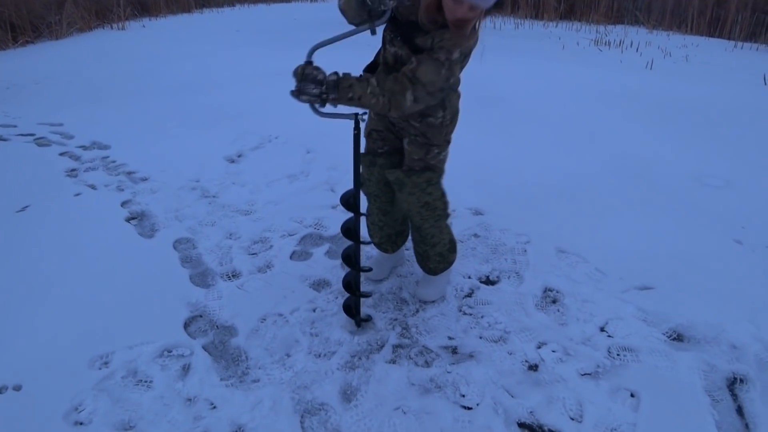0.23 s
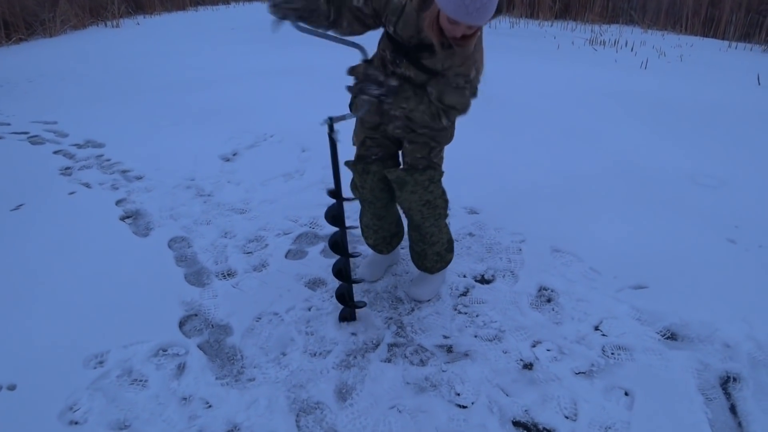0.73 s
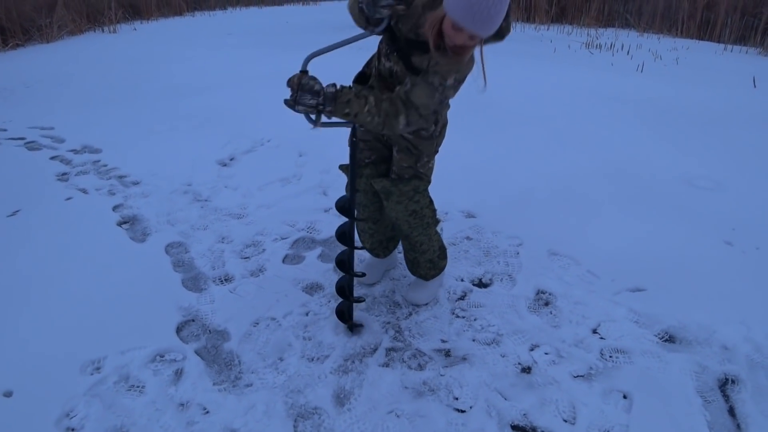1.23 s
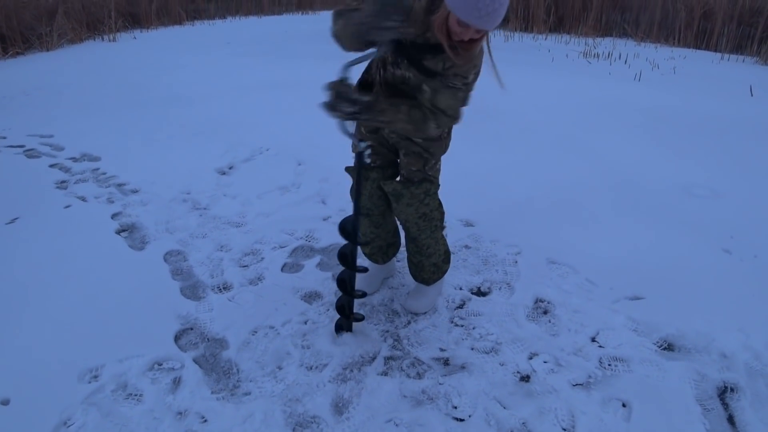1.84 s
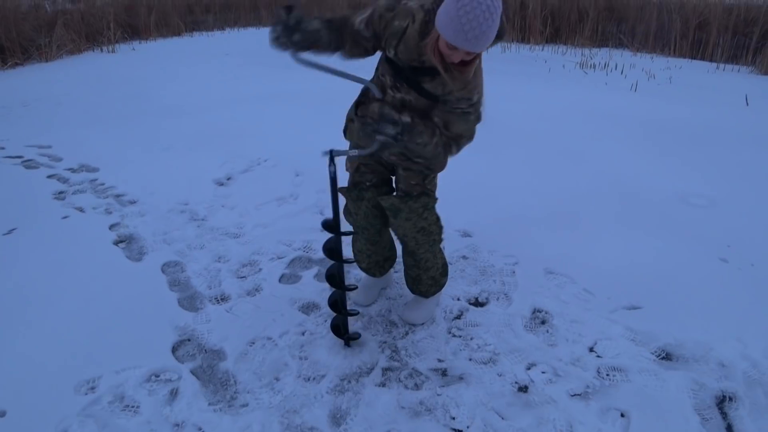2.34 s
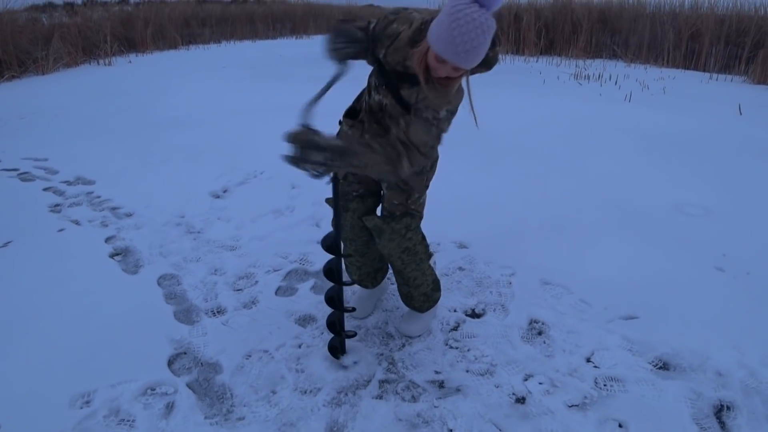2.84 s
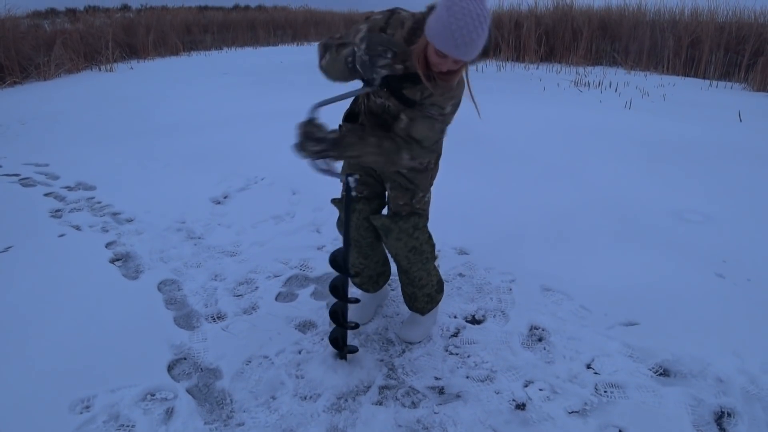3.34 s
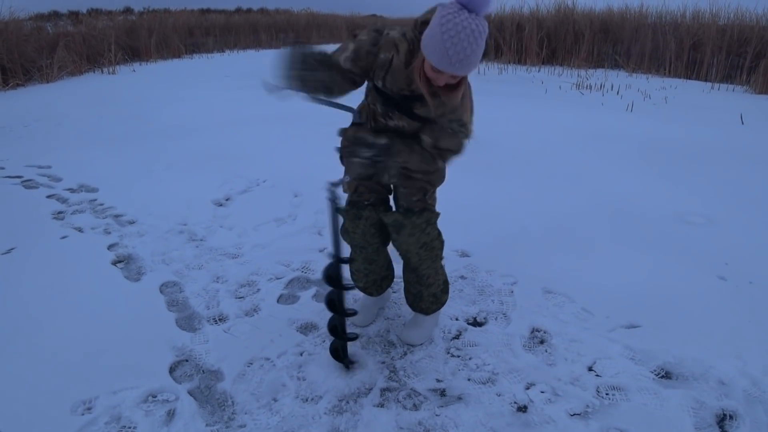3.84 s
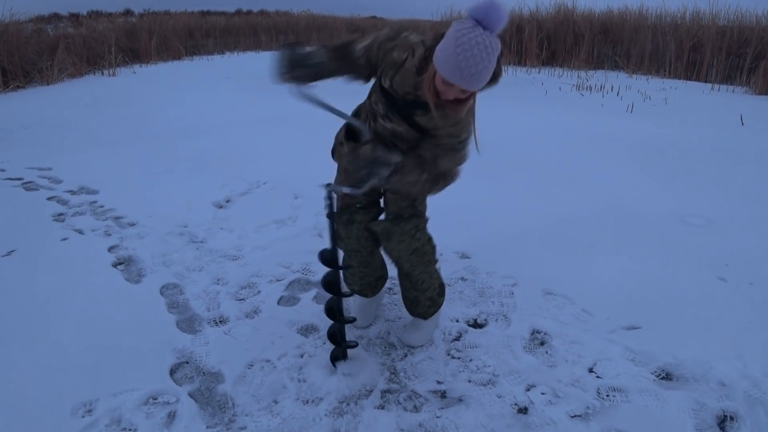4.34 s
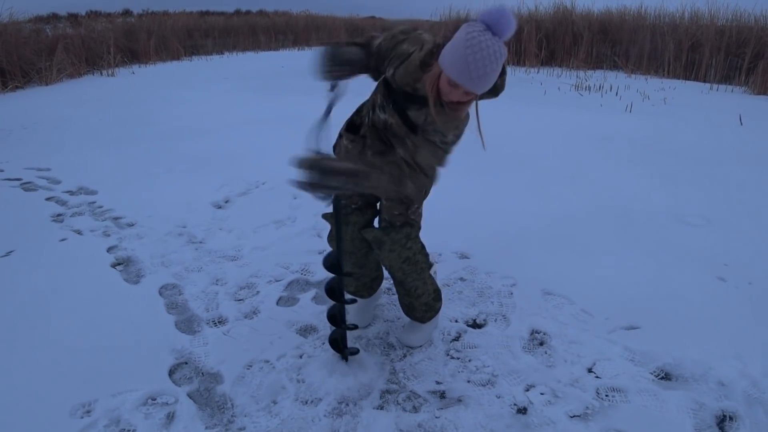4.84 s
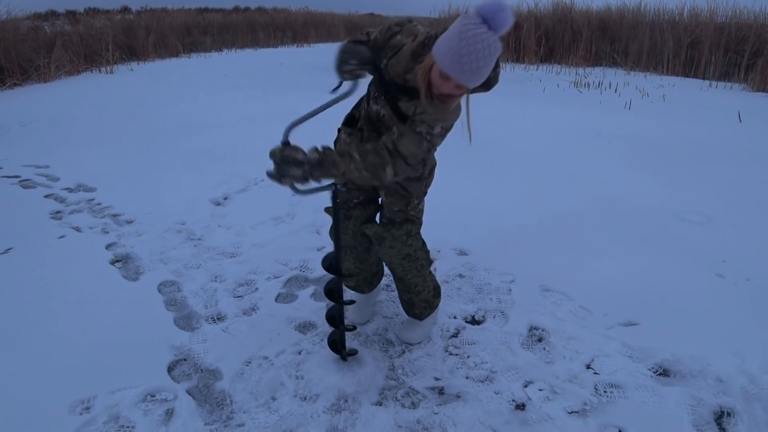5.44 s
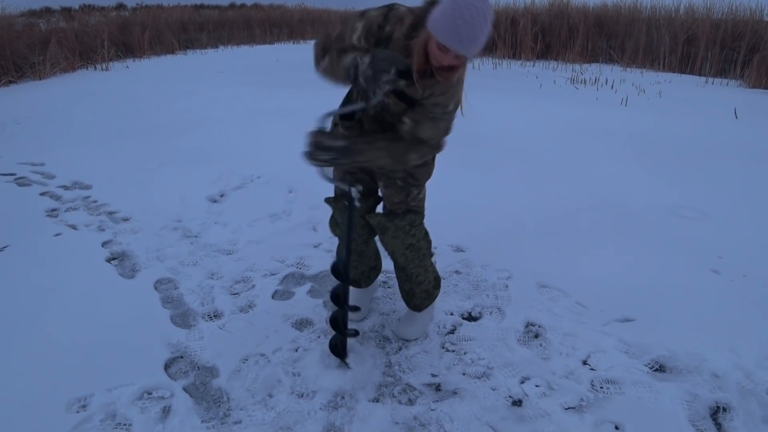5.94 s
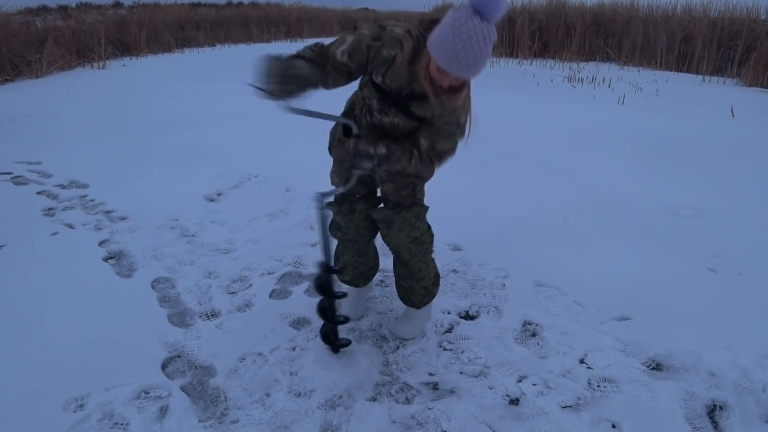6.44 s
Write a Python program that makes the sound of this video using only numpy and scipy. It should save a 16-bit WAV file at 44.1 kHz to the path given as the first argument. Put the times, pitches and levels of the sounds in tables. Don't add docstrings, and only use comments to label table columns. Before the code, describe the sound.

From the start a hand auger is already cutting thick pond ice, close and loud in an open, dry snowy space. Its blades make a dense, bright crunch of shaved chips, rising and slackening with each crank turn of about 0.7 seconds. Underneath, the steel shaft and spiral ring with a hollow, wavering midrange voice, and the ice sheet groans low. Sharp fractures snap near 0.2, 0.4 and 0.85 seconds. Around 1.2 the blades grab and stall; for a moment there is almost only a deep thud and a higher knock, then a hard break at 1.3 and full cutting by 1.4. From 2 to 5 seconds the grinding runs on with scattered cracks, the shaft singing more clearly. From 5.2 to the end it grows choppier, with frequent snaps and a deeper slackening near 6.1, still cutting at about 6.7. Faint low wind buffets the microphone throughout.

```python
import sys
import numpy as np
from scipy import signal
from scipy.fft import rfft, irfft, next_fast_len
from scipy.io import wavfile
from scipy.ndimage import uniform_filter1d, map_coordinates

SR = 44100
rng = np.random.default_rng(int(sys.argv[2]) if len(sys.argv) > 2 else 0)


def gain_from_db(level_db):
    decades = np.asarray(level_db, float) / 20
    return 10 ** decades


def file_out(sig):
    cols = np.atleast_2d(sig).T
    lim = np.clip(cols, -1, 1)
    pcm = np.round(lim * 32767).astype(np.int16)
    wavfile.write(sys.argv[1], SR, pcm)


N = 295029


def unit(x):
    return x / np.sqrt(np.mean(x ** 2) + 1e-20)


def along(points, hz):
    f, v = np.transpose(points)
    return np.interp(np.log(hz + 1), np.log(f + 1), v)


def bumps(rows):
    t = np.arange(N) / SR
    return sum(db * np.cos(np.pi * np.clip((t - s) / length, -.5, .5)) ** 2 for s, db, length in rows)


def wobble(rate):
    return map_coordinates(rng.standard_normal(int(N * rate / SR) + 4), [np.arange(N) * rate / SR])


def field(shape, bins, frames):
    rough = rng.standard_normal(shape)
    return unit(uniform_filter1d(uniform_filter1d(rough, bins, 0), frames, 1))


def filtered(x, response):
    m = next_fast_len(N + SR // 2)
    h = response(np.fft.rfftfreq(m, 1 / SR))
    h = unit(np.abs(h)) * np.exp(1j * np.angle(h))
    return irfft(rfft(x, m) * h, m)[..., :N]


def mode(f, hz, width_hz):
    return 1j * f * width_hz / (hz * hz - f * f + 1j * f * width_hz)


def ringing(x, hz, width_hz):
    return signal.lfilter(*signal.iirpeak(hz, hz / width_hz, SR), x)


# (time [s], peak level [dB])
WIND_GUSTS = [(0.0, -49), (0.33, -44), (.6, -50), (.85, -55), (1.27, -50), (1.75, -61), (1.97, -48),
              (2.4, -51), (2.62, -52), (2.85, -49), (3.3, -51), (3.57, -53), (3.8, -48), (3.95, -49),
              (4.79, -50), (5.23, -50), (6.05, -59)]


def gusts():
    calm_db, fall_db_per_s = -65, 70
    t = np.arange(N) / SR
    power = gain_from_db(2 * calm_db)
    for s, db in WIND_GUSTS:
        power = power + gain_from_db(2 * (db - fall_db_per_s * np.abs(t - s)))
    return np.sqrt(power)


# (frequency [Hz], level [dB per Hz])
WIND_COLOUR = [(18, -3), (40, 6.5), (70, -13), (110, -9), (200, -13), (400, -36), (11000, -50)]


def wind():
    noise = rng.standard_normal((2, N))
    shared, own = filtered(noise, lambda f: gain_from_db(along(WIND_COLOUR, f)))
    level = gusts() * gain_from_db(0.5 + 1.9 * wobble(11.0) + 1.1 * wobble(24.96))
    return level * np.array([shared + 0.3 * own, shared - 0.24 * own])


# (time [s], level [dB], pitch [Hz], t60 [s])
ROCKING = [
    (1.262, -34, 70, .05),
    (1.292, -28, 290, 0.059),
]


def thuds():
    out, t = np.zeros(N), np.arange(SR // 10) / SR
    for s, db, hz, t60 in ROCKING:
        out[round(s * SR):][:len(t)] += gain_from_db(db - 60 * t / t60) * np.sin(2 * np.pi * hz * t)
    return out


# (time [s], depth [dB], length [s])
SLACK_POINTS = [(0.1, -3.5, 0.55), (0.36, -6.5, 0.33), (0.85, -3, 0.18), (1.1, -4, 0.2), (1.55, -2.5, 0.11),
                (2.07, -4, 0.29), (2.2, -1, 0.22), (2.58, -1, 0.2), (2.9, -1.5, 0.12), (2.77, -3.5, 0.18),
                (3.25, -2, 0.33), (3.43, -4.5, .08), (3.49, -2, .12), (3.62, -2, 0.52), (4.16, -5.5, 0.36),
                (4.73, -4, 0.32), (5.16, -3, 0.098), (5.33, -7.5, .3), (5.45, -6.5, 0.12), (5.55, -4, 0.11),
                (5.63, -4, 0.075), (5.82, -1, 0.16), (6.06, -9.5, 0.22), (6.16, -7, 0.28), (6.63, -3, 0.16)]
# (time [s], bite [dB])
STALL_BITE = [
    (1.165, 0.5),
    (1.205, -29),
    (1.225, -7),
    (1.25, -26),
    (1.27, -34.5),
    (1.295, -29),
    (1.31, -9),
    (1.355, -11.5),
    (1.4, 1.5),
]


def cutting():
    full_cut_db, tiring_db_per_s = -19.5, -0.21
    t = np.arange(N) / SR
    stall_db = np.interp(t, *np.transpose(STALL_BITE))
    return full_cut_db + tiring_db_per_s * t + bumps(SLACK_POINTS) + stall_db


# (time [s], peak level [dB], change of the cut just before it [dB])
FRACTURES = [(0.168, -7.5, -2), (0.322, -9.5, 1), (0.376, -7, 0), (0.8488, -7.5, -3), (2.1037, -11, -7),
             (2.566, -8, -2.5), (2.6823, -7.5, -6.5), (2.844, -19, -4.5), (3.4044, -8.5, -5),
             (4.0946, -16, 2), (4.117, -6.5, 4), (4.733, -13, -8), (4.792, -11, -0.5), (4.8707, -27, -8),
             (5.2285, -10.5, -2), (5.292, -8, 0.5), (5.385, -13, -4), (5.428, -8.5, -0.5),
             (5.473, -8.5, -7), (5.777, -12, -3), (5.9417, -12, -3), (5.98, -9.5, -7), (6.01, -9.5, -0.5),
             (6.096, -9.5, 5), (6.1956, -18, -7), (6.3036, -7.5, -2.5), (6.391, -9, -6.5), (6.526, -7, -5),
             (6.6117, -9, -3), (6.6794, -10, -7)]
# (time [s], peak level [dB], knock into the steel [dB], t60 [s])
STALL_GRABS = [
    (1.173, -12, 3, 0.057),
    (1.2133, -19.5, 4, 0.038),
    (1.2256, -14.5, -3, 0.062),
    (1.3032, -4.5, -12.5, 0.034),
    (1.315, -6, -22, 0.033),
    (1.3663, -11, -4, 0.05),
]


def cracks():
    crack_t60_s, crack_knock_db, grab_before_db = 0.056, -9, 1.5
    rise_s, before_s = .0005, 0.021
    air, steel, lead_in_db = np.zeros(N + SR), np.zeros(N + SR), np.zeros(N)
    t = np.arange(SR // 8) / SR
    rows = [(s, db, crack_knock_db, crack_t60_s, before_db) for s, db, before_db in FRACTURES]
    rows += [(*row, grab_before_db) for row in STALL_GRABS]
    for s, db, knock_db, t60, before_db in rows:
        at = round(s * SR)
        burst = gain_from_db(db - 4.5 - 60 * t / t60) * (1 - np.exp(-t / rise_s))
        air[at:][:len(t)] += burst
        steel[at:][:len(t)] += gain_from_db(knock_db) * burst
        lead_in_db[at - len(t):at] += before_db * np.exp(-t[::-1] / before_s)
    return air[:N], steel[:N], lead_in_db


def small_chips(per_s, spread_db, t60):
    size_db = np.minimum(spread_db * rng.exponential(1, N), 8)
    starts = (rng.random(N) < per_s / SR) * gain_from_db(2 * size_db)
    return np.sqrt(signal.lfilter([1], [1, -gain_from_db(-120 / (t60 * SR))], starts) + 1e-9)


def jerks():
    lumps = unit(small_chips(70, 1.34, 0.046))
    hail = unit(small_chips(600, 6.1, 0.0029))
    return unit(1.46 + lumps * 0.49 + hail * 0.39)


MEAN_CUT_DB = -19


def push(cut, level_db, share, knock):
    return np.hypot(gain_from_db(level_db) * cut ** share, knock)


# (frequency [Hz], level [dB per Hz])
SHEET_COLOUR = [(53, -46), (90, -12.5), (200, 3), (355, 2), (432, -9), (480, -48), (620, -23), (1060, -120)]


def sheet_groan(cut, knock):
    level_db = -38 + 2.5 * (np.arange(N) / N - .5) + 1.63 * wobble(12)
    force = push(cut, level_db, 0.31, 0.13 * knock) * rng.standard_normal(N)
    return filtered(force, lambda f: gain_from_db(along(SHEET_COLOUR, f)))


TURN_S, TURN_START_S = .675, .1


def turning(phase):
    return np.cos(2 * np.pi * ((np.arange(N) / SR - TURN_START_S) / TURN_S - phase))


def steel_part(force, modes, drift_db):
    depth = np.arange(N) / N - .5
    power = sum(gain_from_db(2 * row[2]) * row[1] for row in modes) * np.pi / SR
    out = np.zeros(N)
    for k, (hz, width_hz, db, deeper_db, swing_db, phase) in enumerate(modes):
        aim_db = deeper_db * depth + swing_db * turning(phase) + drift_db * wobble(4.13)
        out += (-1) ** k * gain_from_db(db) * ringing(force * gain_from_db(aim_db), hz, width_hz)
    return out / np.sqrt(power)


# (frequency [Hz], width [Hz], level [dB], change as the hole deepens [dB],
# swing per turn [dB], turn phase [0-1])
BEND_MODES = [
    (582.3, 25.2, 7.5, 0, 0.11, 0.83),
    (522, 48, -18, 0, .4, 0.24),
    (696, 99, -36, 0, .4, .3),
]


def low_bend(cut, knock):
    guided_s, guiding_s = 1.83, 0.27
    loose_db = -8 / (1 + np.exp((np.arange(N) / SR - guided_s) / guiding_s))
    force = push(cut, -26.5 + loose_db, 0.78, 0.27 * knock)
    return steel_part(force * rng.standard_normal(N), BEND_MODES, drift_db=-0.45)


# (frequency [Hz], width [Hz], level [dB], change as the hole deepens [dB],
# swing per turn [dB], turn phase [0-1])
SHAFT_MODES = [
    (680, 83, -15, -17, 1.5, 0.51),
    (729.8, 10.7, 4.5, 3, 0.5, 0.1),
    (830, 33, -13, 11.5, -1, 0.36),
    (874.4, 14.6, -15.5, -26.5, 2.5, 0.17),
    (980.6, 27.4, -16.5, 2.5, 3.5, 0.41),
    (1072, 19, -23.5, -8, 8, 0.32),
]
# (time [s], level [dB], length [s])
SHAFT_SWAY = [(0.8, 1.5, .3), (1.03, -5, 0.12), (1.55, 0.5, .25), (1.8, -2.5, 0.19), (2.03, 4.5, 0.27),
              (2.25, -5.5, 0.23), (2.98, -6.5, 0.51), (3.38, 3, 0.41), (3.87, 4.5, 0.57), (4.3, 1, 0.56),
              (4.7, -3.5, 0.44), (5.0, 1, 0.23), (5.2, -1, .2), (5.95, 4.5, 0.2), (6.4, -1, 0.47)]


def shaft_ring(cut, knock):
    level_db = -23.5 + bumps(SHAFT_SWAY) - 0.2 * bumps(SLACK_POINTS)
    force = push(cut, level_db, 1.0, knock)
    return steel_part(force * rng.standard_normal(N), SHAFT_MODES, drift_db=-0.87)


def patchy(fine_db, broad_db):
    z = signal.stft(rng.standard_normal(N), nperseg=1024, noverlap=768)[2]
    gain_db = fine_db * field(z.shape, bins=2, frames=12) + broad_db * field(z.shape, bins=30, frames=8)
    return unit(signal.istft(z * gain_from_db(gain_db), nperseg=1024, noverlap=768)[1][:N])


# (frequency [Hz], width [Hz], level [dB], change as the hole deepens [dB],
# swing per turn [dB], turn phase [0-1])
SPIRAL_MODES = [(1205.4, 14, -6, 6, 4.6, 0.73), (1377, 36, -10, 3.5, 5.4, 0.45),
                (1501.6, 38.4, 0, -7, 1.1, 0.91), (1579, 17.5, 3.5, -1, 0.48, 0.56),
                (1639, 64, -5.5, 0, 1.5, 0.062), (1725, 33, -2.5, -0.5, 1.2, 0.24),
                (1804, 60, -5.5, 1, 1, 0.46), (1890, 51, -5.5, -0.5, 1.2, 0.41),
                (1998, 62, -7.5, 1.5, 3.2, 0.13), (2187, 37, -5, 2.5, 1.7, 0.44),
                (2350, 70, -10.5, -0.5, 0.82, 0.61)]


def spiral_ring(cut, knock, grip_db):
    level_db = -21.3 - 0.08 * bumps(SLACK_POINTS)
    force = push(cut, level_db, 0.82, knock) * patchy(fine_db=2.0, broad_db=1.13)
    spiral = steel_part(force, SPIRAL_MODES, drift_db=0.77)
    return spiral - (1 - gain_from_db(grip_db)) * ringing(spiral, SPIRAL_MODES[0][0], 150)


# (frequency [Hz], width [Hz], level [dB])
BLADE_MODES = [
    (3037, 27, 2.5),
    (4070, 98, -5.5),
    (4640, 36, -12),
    (4400, 21, 5.5),
    (4720, 35, -25),
    (4840, 15, -5),
    (5980, 66, -3.5),
    (7004, 520, 4.5),
    (8150, 150, 1),
]
# (frequency [Hz], level [dB per Hz])
CHIP_COLOUR = [(530, -39), (900, -1), (968, -4), (1120, -4), (1180, -6.5), (1270, -2.5), (1540, -9.5),
               (2570, -13), (4910, -8), (6380, -14), (9800, -17.5), (11000, -16.5), (14300, -55),
               (22000, -120)]


def ice_crunch(cut, snap):
    def colour(f):
        blades = 1 + 0.49 * sum(gain_from_db(db) * mode(f, hz, w) for hz, w, db in BLADE_MODES)
        above = 1 / (1 + (2300 / (f + 1)) ** 4)
        return gain_from_db(along(CHIP_COLOUR, f)) * blades * np.sqrt(above + 0.024)

    chips = np.hypot(gain_from_db(MEAN_CUT_DB + 1.06) * cut, snap)
    return filtered(chips * patchy(fine_db=3.0, broad_db=1.06), colour)


# (frequency [Hz], width [Hz], depth [0-1], turn phase [0-1])
TURN_HOLLOWS = [
    (1292, 95, 1, 0.7),
    (2910, 840, 0.65, .78),
]


def shadowed(x):
    for hz, width_hz, depth, phase in TURN_HOLLOWS:
        opening = np.clip(0.44 + 0.27 * turning(phase), 0, 1)
        x = x - depth * opening * ringing(x, hz, width_hz)
    return x


# (time [s], damping [dB], length [s])
ICE_GRIP = [
    (1.268, -18, 0.071),
]


def auger():
    snap, knock, lead_in_db = cracks()
    cut = gain_from_db(cutting() + lead_in_db - MEAN_CUT_DB) * jerks()
    grip_db = bumps(ICE_GRIP)
    shaft = low_bend(cut, knock) + shaft_ring(cut, knock)
    spiral = spiral_ring(cut, knock, grip_db)
    voice = ice_crunch(cut, snap) + gain_from_db(1.3 * grip_db) * shaft + gain_from_db(0.13 * grip_db) * spiral
    return shadowed(voice) + gain_from_db(0.6 * grip_db) * sheet_groan(cut, knock) + thuds()


# (frequency [Hz], level [dB])
SCATTER_WIDTH = [(60, -7), (110, -12), (190, -13.5), (340, -11.5), (610, -11.5), (1090, -9.5), (1950, -13),
                 (3490, -13), (6240, -12.5), (11200, -10)]
# (frequency [Hz], level [dB])
LEFT_LEAN = [(100, -0.5), (700, 1.7), (1500, 2), (4000, 1), (9000, 0.5)]


def ports(x):
    hz, _, z = signal.stft(x, SR, nperseg=512)
    random = field(z.shape, bins=3, frames=9) + 1j * field(z.shape, bins=3, frames=9)
    scatter = np.exp(1j * np.angle(random))
    side = z * scatter * gain_from_db(along(SCATTER_WIDTH, hz) - 2.5)[:, None]
    lean = gain_from_db(along(LEFT_LEAN, hz) / 2)[:, None]
    return signal.istft(np.array([(z + side) * lean, (z - side) / lean]), SR, nperseg=512)[1][:, :N]


def scene():
    return ports(auger()) + wind()


def top_cut(x):
    return signal.sosfilt(signal.butter(12, 11750, fs=SR, output="sos"), x)


def record(dry):
    overload, top_hz, edge_hz = .72, 11050, 110
    soft = dry / (1 + np.abs(dry / overload) ** 4) ** (1 / 4)
    m = next_fast_len(N)
    edge = np.clip((top_hz - np.fft.rfftfreq(m, 1 / SR)) / edge_hz, 0, 1)
    limited = irfft(rfft(soft, m) * np.sin(np.pi / 2 * edge) ** 2, m)[:, :N]
    return top_cut(limited)


dry = scene()
out = record(dry)
file_out(out)
```